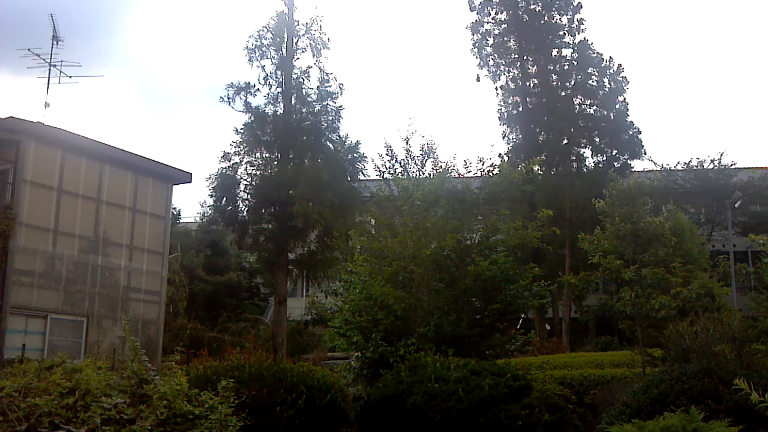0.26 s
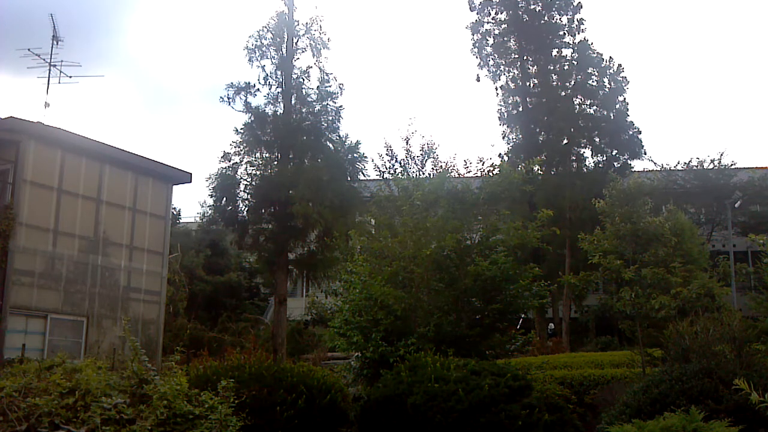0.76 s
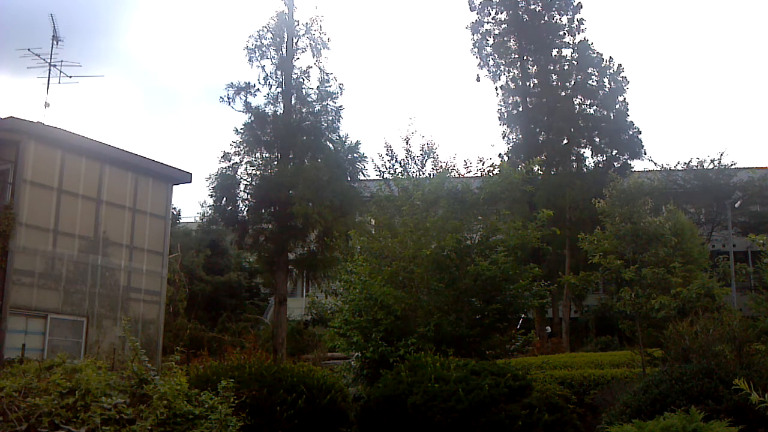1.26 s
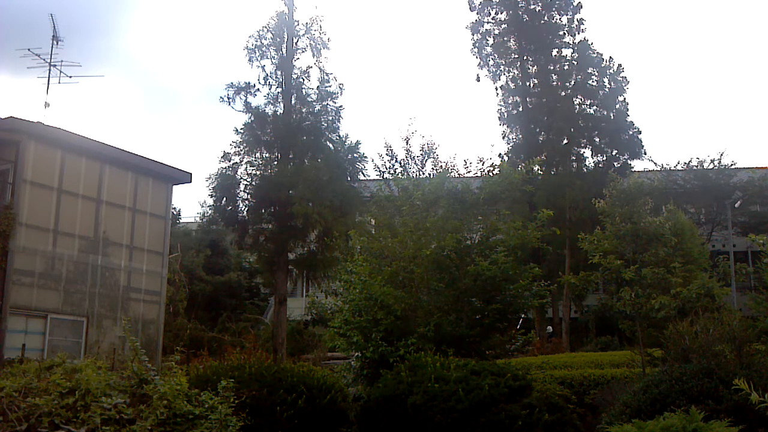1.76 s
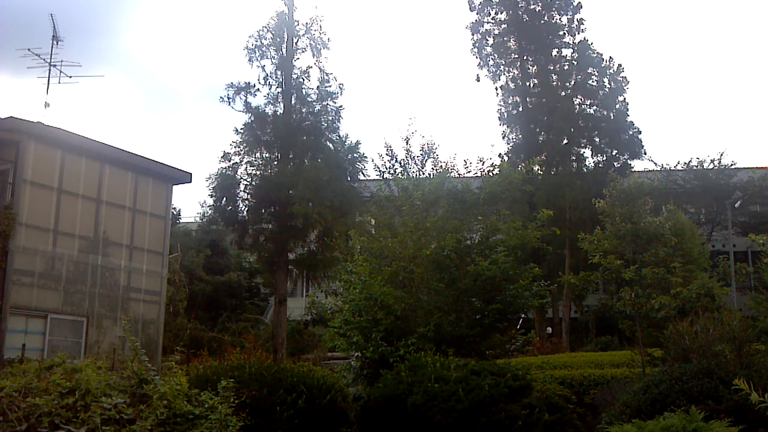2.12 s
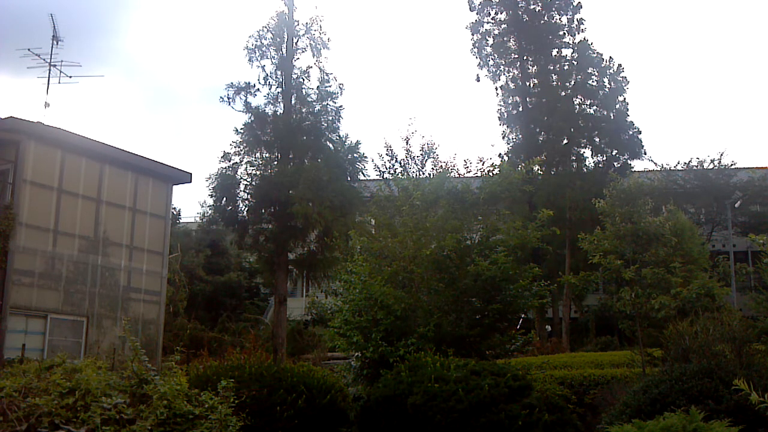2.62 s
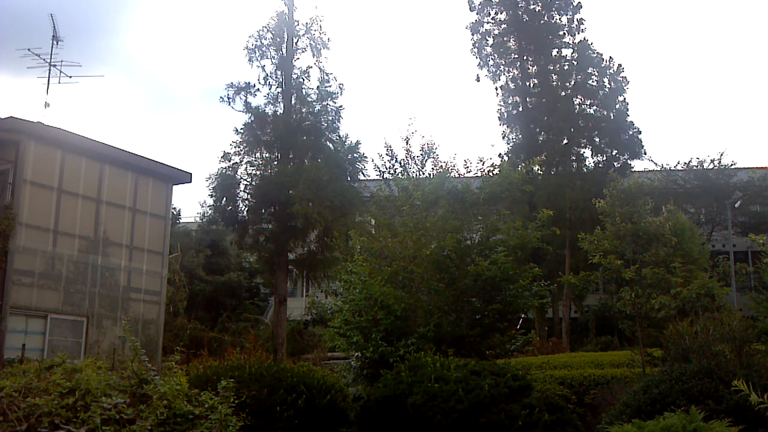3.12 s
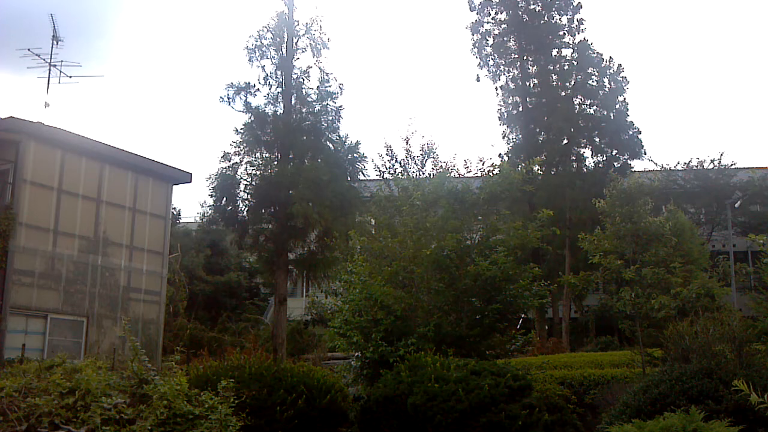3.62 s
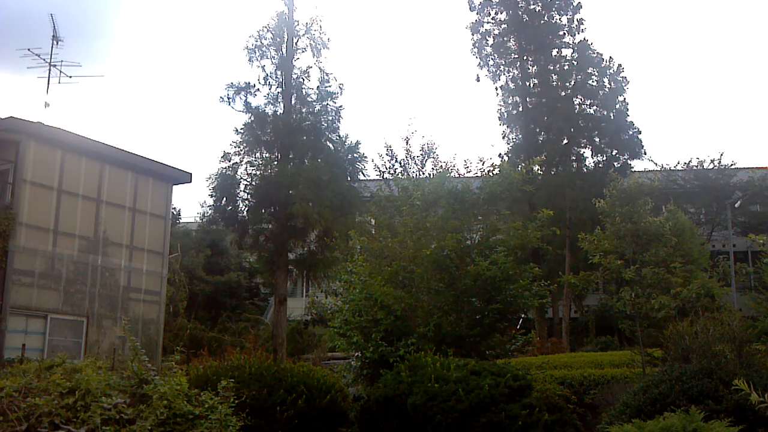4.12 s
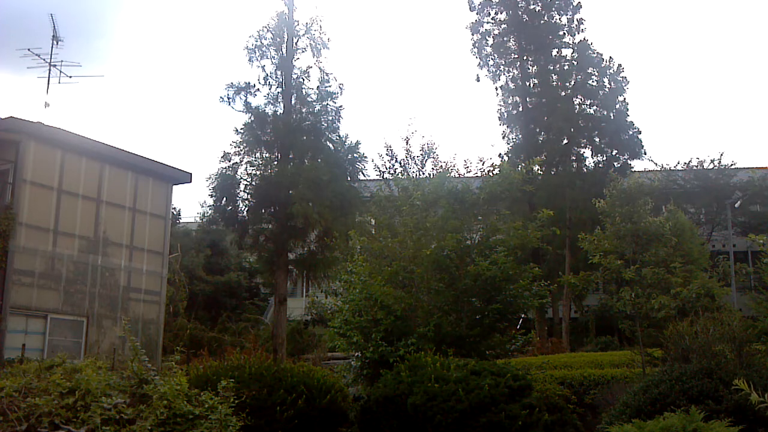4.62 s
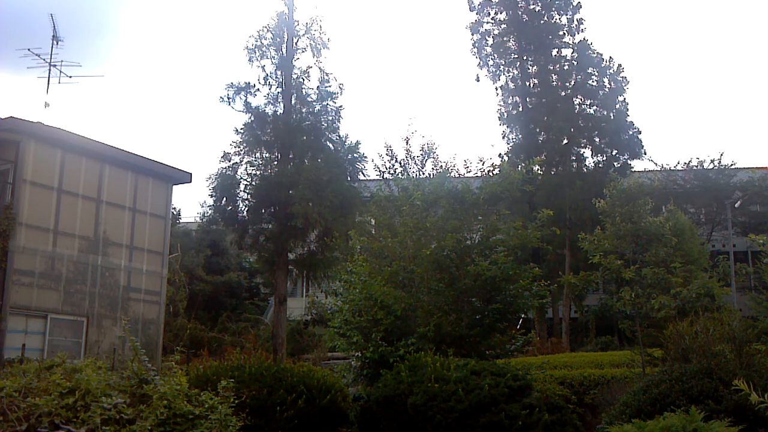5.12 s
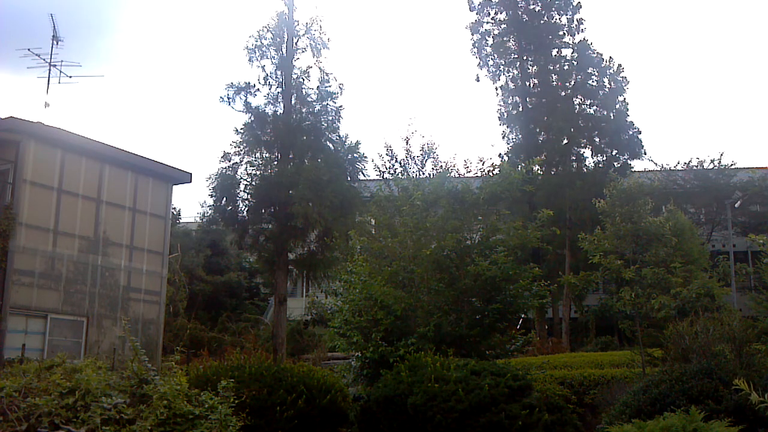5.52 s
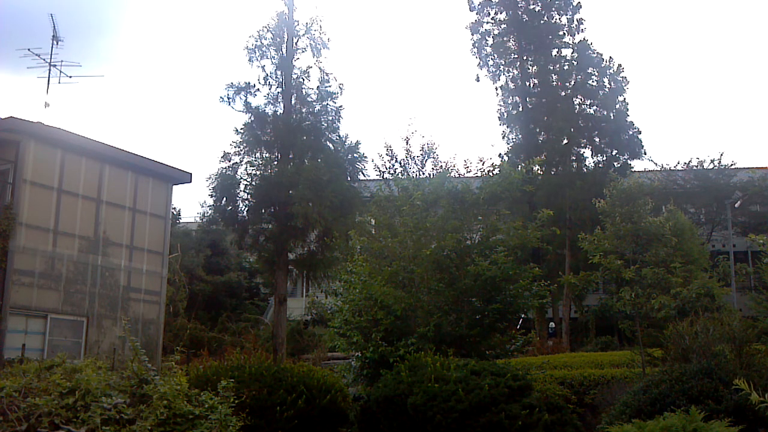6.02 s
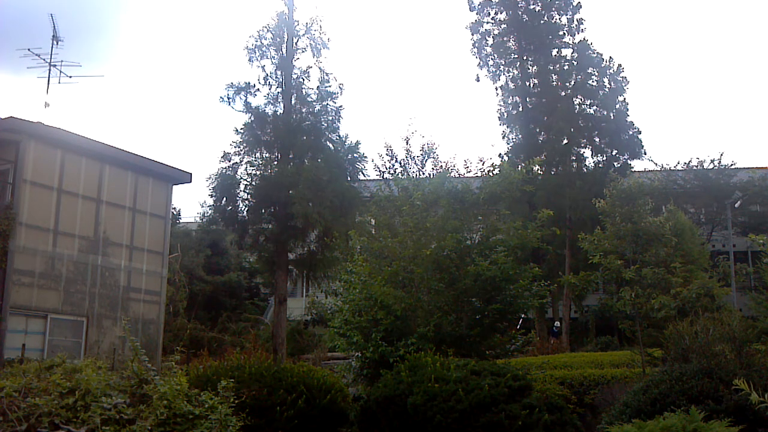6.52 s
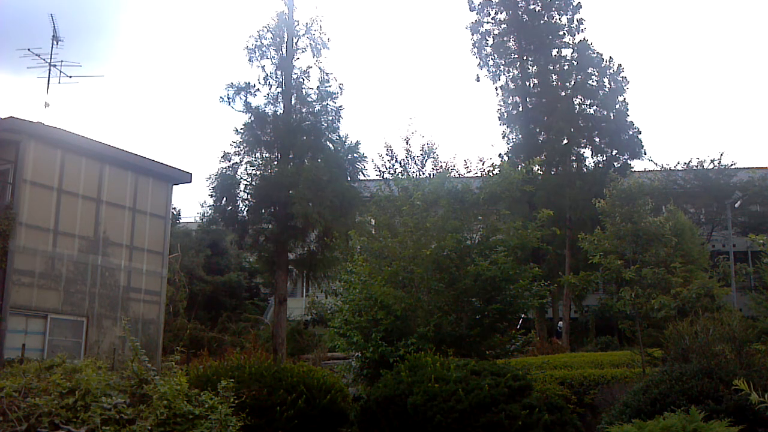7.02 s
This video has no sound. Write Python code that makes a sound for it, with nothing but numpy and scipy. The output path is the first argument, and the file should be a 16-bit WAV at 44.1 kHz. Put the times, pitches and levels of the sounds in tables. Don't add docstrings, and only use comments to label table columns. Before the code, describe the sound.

A mono outdoor scene of about seven seconds, heard from across a garden. A hammer drives a wedge into a thin trunk: full blows at 0.1 and 1.45 s, a feeble, clacky tap at 2.3, another full blow at 3.4, then tighter, higher knocks at 4.3 and, slightly softer, 5.3. Each is a short damped thud without deep bass, with brief trunk ring, slap of faces and steel crack, followed by echoes under a tenth and near two tenths of a second and a diffuse tree tail. Very high, fast bird chips come in bursts around 0.2, 1.0-1.7, 2.1-2.9, 3.1-4.2, 5.1-5.5 and 6.4-6.7 s. A fainter bird whistles quick gliding motifs, clearest from 2.6 to 4.9. Overlapping cicadas swell, buzz and stop over a thin high drone. A quiet distant hum persists; a twig ticks twice quickly at 6.8.

```python
import sys
import numpy as np
from scipy import signal
from scipy.fft import rfft, irfft, next_fast_len
from scipy.io import wavfile
from scipy.ndimage import uniform_filter1d, map_coordinates

SR = 44100
rng = np.random.default_rng(int(sys.argv[2]) if len(sys.argv) > 2 else 0)


def voltage_ratio(decibels):
    exponent = np.asarray(decibels, float) / 20
    return 10 ** exponent


def unload_wav(signal):
    wavfile.write(
        sys.argv[1],
        SR,
        np.round(np.clip(np.atleast_2d(signal).T, -1, 1) * 32767).astype(np.int16),
    )


N = 320607


def unit(x):
    return x / np.sqrt(np.mean(x ** 2) + 1e-20)


def along(points, hz):
    f, v = np.transpose(points)
    return np.interp(np.log(hz + 1), np.log(f + 1), v)


def curves(rows, size=N):
    s, *cols = np.transpose(rows)
    return [np.interp(np.arange(size) / SR, s, c) for c in cols]


def wobble(rate_hz):
    return map_coordinates(rng.standard_normal(800), [np.arange(N) * rate_hz / SR])


def filtered(x, response):
    m = next_fast_len(len(x) + SR // 2)
    return irfft(rfft(x, m) * response(np.fft.rfftfreq(m, 1 / SR)), m)[:len(x)]


def resonance(centre_hz, width_hz):
    return lambda f: 1j * f * width_hz / (centre_hz ** 2 - f * f + 1j * f * width_hz)


def add(track, s, sound):
    at = round(s * SR)
    part = track[max(at, 0):max(at + len(sound), 0)]
    part += sound[max(-at, 0):][:len(part)]


def ring(modes, t):
    return sum(voltage_ratio(db - 60 * t / t60) * np.sin(2 * np.pi * hz * t) for hz, db, t60 in modes)


def hammer():
    # (time [s], peak [dB], thud [Hz], trunk ring [dB], clack [dB])
    blows = [
        (0.087, -14.5, 940, -3.5, -24),
        (1.45, -14, 940, -6, -21.5),
        (2.311, -35, 884, 7.5, -8),
        (3.383, -14.5, 960, -4.5, -17),
        (4.339, -14.5, 1210, -9.5, -16.5),
        (5.337, -16, 1179, -5, -16),
    ]
    # (frequency [Hz], level [dB], t60 [s])
    trunk_modes = [(671, 0, 0.046), (787.6, -2, 0.047), (977, 7, 0.016), (1073, -5, 0.022),
                   (1156, 7, 0.011), (1354, 5.5, 0.0087)]
    crack_under_db, full_blow_db, crack_growth = -4.5, -16, 0.56
    direct, t = np.zeros(N), np.arange(SR // 8) / SR
    to_walls, to_trees, to_far_house = np.zeros((3, N))
    impulse = np.eye(1, len(t))[0]

    def faces(f):
        return resonance(1600, 1300)(f) * resonance(2400, 1700)(f)

    def steel(f):
        return resonance(5400, 3600)(f) * resonance(5000, 5000)(f) / (1 + 1j * f / 9000) ** 2

    def thin_trunk_and_dull_top(f):
        top = 1j * f / 7600
        return (1j * f / (330 + 1j * f)) ** 3 / (1 + top / 0.98 + top ** 2)

    for s, db, thud_hz, ring_db, clack_db in blows:
        tight = thud_hz / 950
        thud = -2.8 * ring([(thud_hz, 0, 0.0087 / tight ** 0.67)], t)
        thud *= (1 - np.exp(-t / 0.0014)) ** tight ** 2
        wood = -voltage_ratio(ring_db - 3.0) * ring(trunk_modes, t * tight ** 0.086) * (1 - np.exp(-t / 0.0024))

        chatter = rng.standard_normal(len(t)) * voltage_ratio(-60 * t / 0.022) * (1 - np.exp(-t / 0.00092))
        clack = voltage_ratio(clack_db + 34.5) * filtered(chatter / np.linalg.norm(chatter), faces)
        slap = voltage_ratio(clack_db + 34.0) * filtered(impulse, faces)

        crack_db = clack_db + crack_under_db + crack_growth * (db - full_blow_db)
        crack = voltage_ratio(crack_db + 26) * filtered(impulse, steel)
        grit = voltage_ratio(crack_db) * unit(filtered(rng.standard_normal(len(t)), steel)) * voltage_ratio(-60 * t / 0.013)

        sideways = voltage_ratio(-30 * (tight - 1))
        add(direct, s + 0.00037, voltage_ratio(db + 2.0) * (thud + wood + 0.68 * clack + 0.25 * crack + grit))
        add(to_walls, s + 0.00042, voltage_ratio(db + 1.5) * (sideways * thud + wood + 0.82 * clack + 0.54 * crack))
        add(to_trees, s + 0.00042, voltage_ratio(db + 1.5) * (sideways * thud + wood + slap + 1.9 * crack))
        far = sideways ** 0.42 * thud + 0.5 * wood + 0.27 * clack + 0.3 * crack
        add(to_far_house, s + 0.00036, voltage_ratio(db + 0.6) * far)
    spread = [filtered(path, thin_trunk_and_dull_top) for path in (to_walls, to_trees, to_far_house)]
    return filtered(direct, thin_trunk_and_dull_top), spread


def yard():
    # (delay [s], level [dB], dull above [Hz])
    near_walls = [(.0034, -8.5, 3000), (.0066, -8, 2420), (0.0095, -9.5, 1800), (.0135, -10.5, 1500),
                  (0.075, -34, 1600), (0.0793, -12, 1480), (.0882, -31, 1600)]
    # (delay [s], level [dB], dull above [Hz])
    far_house = [(.1685, -24, 1500), (0.1714, -8.5, 1600), (0.1798, -10.5, 1500)]
    # (delay [s], hold [s], t60 [s], level [dB], treble over it [dB])
    belts = [(.004, 0.049, .09, -30, 8.5), (0.066, 0.013, 0.61, -23, 4.5), (0.17, 0.015, 0.064, -23, -8),
             (0.199, 0.011, 1.3, -39.5, -1.5), (.3, .45, 1.7, -50, -2)]
    rise_s = 0.0058
    size = SR * 4 // 5
    t = np.arange(size) / SR

    def mirrors(walls):
        def response(f):
            return sum(voltage_ratio(db) * np.exp(-2j * np.pi * f * s) / (1 + 1j * f / (2.1 * hz)) ** 3
                       for s, db, hz in walls)
        return filtered(np.eye(1, size)[0], response)

    shapes = [np.clip((t - s) / rise_s, 0, 1) * voltage_ratio(db - 60 * np.maximum(t - s - hold, 0) / t60)
              for s, hold, t60, db, _ in belts]
    dull = np.sqrt(sum(g ** 2 for g in shapes))
    bright = np.sqrt(sum((g * voltage_ratio(row[-1])) ** 2 for g, row in zip(shapes, belts)))
    noise = rng.standard_normal(size)
    low = filtered(noise, lambda f: 1 / (1 + (f / 1300) ** 4))
    top = filtered(noise, lambda f: 1 - 1 / (1 + (f / 3800) ** 4))
    air = voltage_ratio(-60 * t / 0.5)
    scatter = voltage_ratio(-18.5) * (dull * low + bright * (noise - low - top + 1.07 * air * top))
    return mirrors(near_walls), scatter, mirrors(far_house)


def trill_chips():
    # (first chip [s], last chip [s], level [dB], growth [dB per chip], early hurry [s])
    trills = [
        (0.204, 0.626, -53, -.5, 0.014),
        (1.342, 1.721, -51.5, -0.5, 0.011),
        (2.522, 2.907, -48.5, 1.4, 0.013),
        (3.8275, 4.153, -45, -.6, 0.0052),
        (5.0494, 5.491, -45.5, -0.1, 0.0053),
        (6.346, 6.7276, -47.5, -0.1, .013),
    ]
    chip_gap_s, hurry_fades, ends_db = 0.055, 0.42, -5
    first_hz, peak_hz, sag_hz, overshoot = 8000, 8396, 45, 0.26
    rows = []
    for first, last, db, growth_db, hurry in trills:
        k = np.arange(round((last - first) / chip_gap_s) + 1)
        early = hurry * (1 - hurry_fades ** k)
        times = first + (last - first + early[-1]) * k / k[-1] - early
        levels = db + growth_db * (k - k[-1] / 2) + ends_db * ((k == 0) | (k == k[-1]))
        levels = levels + rng.normal(0, 0.46, len(k))
        loud_hz = np.where(k == 0, first_hz, peak_hz - sag_hz * k) + rng.normal(0, 70, len(k))
        rows += zip(times, levels, loud_hz, overshoot + rng.normal(0, 1, len(k)) / 20)
    return rows


def trill():
    # (time [s], peak [dB], loudest [Hz], overshoot [0-1])
    uneven_chips = [(1.0261, -53, 7540, 0.2), (1.0799, -65, 7740, .2), (1.1368, -64, 7700, .3),
                    (1.2002, -55, 8080, .3), (1.254, -46.5, 8160, 0.37), (1.3074, -56, 7700, 0.5),
                    (1.3688, -54, 7760, .3), (1.434, -70, 7600, 0), (2.0872, -56, 7760, 0.07),
                    (2.139, -59, 7740, 0.1), (2.193, -53.5, 7850, .9), (2.2538, -49, 7800, 1),
                    (2.3007, -54, 7700, .9), (2.36, -46.5, 8080, 0.25), (2.4206, -47, 8000, 0.3),
                    (3.0735, -49, 7940, 0.14), (3.1308, -63, 8000, .5), (3.1842, -50.5, 7900, 0.45),
                    (3.2344, -46.5, 7900, 0.9), (3.29, -41, 8230, 0.13), (3.3492, -41, 8260, .04),
                    (3.4132, -58, 7640, .3), (3.469, -42, 8290, 0), (5.1194, -54, 8100, .2),
                    (5.246, -57, 8200, .3), (5.3053, -54, 7960, 0.4)]
    track = np.zeros(N)
    u = np.linspace(-1, 1, round(0.0139 * SR))
    for s, db, loud_hz, over in trill_chips() + uneven_chips:
        top_hz = loud_hz + 150 + 900 * np.clip(over, 0, 1.3)
        hz = top_hz - (top_hz - 6700) * np.abs(u) ** 1.6
        beak = 1 / (1 + ((hz - loud_hz) / 450) ** 2)
        level = voltage_ratio(db - 7.5) * beak * np.cos(np.pi * u / 2) ** 0.5
        add(track, s - 0.0045, level * np.sin(2 * np.pi * np.cumsum(hz) / SR))
    return track


def songbird():
    # (time into the motif [s], frequency [Hz], level [dB])
    low = [
        [(0, 3600, -5.5), (.03, 3900, -1.5), (.046, 4250, -3.5), (.056, 4200, -4), (.066, 3700, -7)],
        [(.042, 3000, -2), (.053, 3370, -7.5), (.066, 3700, -7)],
        [(.078, 3780, -2), (.097, 4000, -2.5), (.112, 4250, -1), (.121, 4000, -5.5), (.132, 2900, -8)],
    ]
    mid = [
        [(0, 3650, -11), (.045, 4450, -7.5), (.075, 4680, -5), (.104, 4760, -3), (.113, 4300, -11)],
        [(.065, 3700, -13), (.082, 4150, -4), (.095, 4400, -9)],
        [(.118, 4550, -19), (.15, 4720, -15), (.174, 4750, -19), (.18, 4000, -9), (.186, 3000, -11)],
    ]
    high = [
        [(0, 4000, -12), (.012, 4500, -2), (.045, 5350, 0), (.085, 6250, -4), (.108, 6200, -5),
         (.118, 5200, -12)],
        [(.062, 3300, -14), (.078, 4650, -10), (.1, 5250, -10), (.115, 5600, -4), (.128, 5900, -5)],
        [(.14, 6200, -8), (.17, 6250, -5), (.178, 5300, -9)],
    ]
    short = [
        [(0, 3698, -18), (.012, 4584, -5), (.045, 5350, -6.5), (.07, 5858, -5)],
        [(.06, 3630, -10), (.068, 4244, -12), (.088, 5098, -11)],
        [(.097, 5227, -2), (.108, 5400, -6), (.122, 6400, -7)],
    ]
    flat = [
        [(0, 3700, -4), (.025, 3900, 0), (.048, 4000, -4)],
        [(.04, 3150, -5), (.052, 3350, -1), (.064, 3550, -5)],
        [(.074, 3800, -3), (.09, 3900, 0), (.11, 3950, -4)],
    ]
    fall = [
        [(0, 4500, -3), (.04, 4300, 0), (.085, 4100, -2)],
    ]
    # (time [s], level [dB], pitch factor)
    low_at = [(-.11, -65, 0.98), (0.153, -63.5, 1.001), (0.445, -60, 1), (.665, -61, 1.01),
              (0.93, -60.5, 0.99), (1.129, -62, 1.01), (1.424, -65, 0.99), (1.63, -65, 1.001),
              (1.874, -63.5, 0.98), (2.099, -63.5, 0.98), (2.366, -66, 1.04)]
    mid_at = [(2.74, -56, 1.001), (3.176, -56, 1.001)]
    high_at = [(3.025, -60, 1.001)]
    short_at = [(2.596, -60.5, 0.96), (3.491, -54, 1.1), (3.891, -56.5, 1.02), (4.305, -51.5, 1.001),
                (4.736, -57, 1.01)]
    flat_at = [(3.67, -70, 1.0), (4.07, -69, 1.0), (4.9, -77, .97)]
    fall_at = [(5.89, -74.5, 1.0), (7.09, -78, .97)]
    track = np.zeros(N)
    for motif, times in [(low, low_at), (mid, mid_at), (high, high_at),
                         (short, short_at), (flat, flat_at), (fall, fall_at)]:
        for s, db, pitch in times:
            for note in motif:
                into, hz, note_db = np.transpose(note)
                t = np.arange(into[0], into[-1], 1 / SR)
                glide_hz = pitch * uniform_filter1d(np.interp(t, into, hz), size=90)
                level = voltage_ratio(db - 3.5 + np.interp(t, into, note_db) + rng.normal(0, 1))
                level = level * signal.windows.tukey(len(t), 0.12)
                add(track, s + into[0], level * np.sin(2 * np.pi * np.cumsum(glide_hz) / SR))
    return track * voltage_ratio(1.54 * wobble(70))


def cicadas():
    # (tymbal [Hz], swell [dB], phrases (start [s], end [s], last level [dB]))
    singers = [
        (6670, 9.2, [(-.3, .27, -64), (1.0, 1.53, -65.5), (2.3, 2.815, -65), (3.62, 4.165, -65), (5.02, 5.56, -65), (6.28, 6.83, -65.5)]),
        (6430, 6.2, [(-.1, .48, -70), (1.05, 1.65, -67), (2.06, 2.87, -74), (3.3, 3.87, -73), (4.48, 4.983, -69), (5.6, 6.134, -70.5), (6.78, 7.246, -69.5)]),
        (6165, 2.6, [(-.2, .45, -70.5), (.9, 1.76, -75.5), (2.19, 2.9, -72), (3.6, 4.27, -72), (4.9, 5.56, -71.5), (6.2, 6.862, -70)]),
        (5970, 6.5, [(.5, 1.45, -76), (2.3, 2.85, -69.5), (3.42, 4.1, -72), (4.5, 5.3, -74), (5.81, 6.401, -72.5), (6.9, 7.5, -74.5)]),
        (5300, 1.6, [(-0.58, 4.3, -86)]),
    ]
    # (frequency [Hz], width [Hz], level [dB])
    chorus = [(6280, 1700, -79), (5300, 270, -102)]
    out = np.zeros(N)
    for tymbal_hz, swell_db, phrases in singers:
        for start, end, last_db in phrases:
            u = np.linspace(0, 1, round((end - start) * SR))
            turns = np.cumsum(147 - 19 * u) / SR
            clicks = np.diff(np.floor(turns), prepend=0)
            rattle = (0.5 + 0.5 * np.cos(2 * np.pi * turns)) ** 4 + 0.11
            drive = 17 * clicks * voltage_ratio(rng.normal(0, 1.2, len(u))) + rattle * rng.standard_normal(len(u))
            swell = voltage_ratio(last_db - swell_db * (1 - u ** 0.7))
            swell = swell * np.minimum(1, np.minimum(u / 0.08, (1 - u) / 0.02))
            add(out, start, swell * unit(filtered(drive, lambda f: resonance(tymbal_hz, 360)(f) ** 3)))
    for hz, width_hz, db in chorus:
        blur = filtered(rng.standard_normal(N), lambda f: resonance(hz, width_hz)(f) ** 3)
        out += voltage_ratio(db + wobble(3.9)) * unit(blur)
    return out


def garden(x):
    # (frequency [Hz], t60 [s])
    decay = [(3000, 0.96), (9000, 0.13)]
    hz, t, z = signal.stft(rng.standard_normal(SR // 2), SR, nperseg=256)
    tail = signal.istft(z * voltage_ratio(-60 * t / along(decay, hz)[:, None]), SR, nperseg=256)[1]
    return signal.fftconvolve(x, tail / np.linalg.norm(tail))[:N]


def twig():
    # (time [s], peak [dB])
    snaps = [
        (6.8215, -43.5),
    ]
    track = np.zeros(N)
    for s, db in snaps:
        for lag_s, lag_db in [(0, 7), (0.0025, -1)]:
            add(track, s + lag_s, voltage_ratio(db + lag_db + 10) * np.ones(1))

    def wood(f):
        return (resonance(1100, 1800)(f) - 0.55 * resonance(4800, 2500)(f)) / (1 + 1j * f / 6000)

    return filtered(track, wood)


def town():
    # (frequency [Hz], density [dB per Hz])
    spectrum = [(25, -36), (42, -37), (95, -30.5), (119, -20), (282, -7.5), (536, -1.34), (700, -1.1),
                (936, -2), (1900, -11), (3470, -22), (4850, -21.5), (5800, -30.5), (7600, -27),
                (13500, -28.5), (15600, -29.5)]
    # (time [s], level [dB])
    hum_level = [(0, -67), (1.2, -66), (2.2, -65), (3.2, -65.5), (4.2, -64.5), (5.2, -65.5), (6.2, -66),
                 (7.27, -65.5)]
    z = signal.stft(rng.standard_normal(N), nperseg=512)[2]
    patches = uniform_filter1d(rng.standard_normal(z.shape), size=6, axis=0)
    patches = uniform_filter1d(patches, size=14, axis=1)
    noise = signal.istft(z * voltage_ratio(1.68 * unit(patches)), nperseg=512)[1][:N]
    hum = unit(filtered(noise, lambda f: voltage_ratio(along(spectrum, f))))
    return voltage_ratio(curves(hum_level)[0] + 1.02) * hum


def scene():
    direct, spread = hammer()
    echoes = signal.fftconvolve(spread, yard(), axes=1)[:, :N].sum(axis=0)
    birds = trill() + songbird()
    insects = cicadas()
    haze = voltage_ratio(-6.0) * garden(birds + 0.92 * insects)
    return (direct + echoes + birds + haze + insects + twig() + town())[None]


def low_pass(x):
    return signal.sosfilt(signal.butter(12, 15780, fs=SR, output="sos"), x)


def record(dry):
    offset = -1.0e-4
    kept = filtered(dry[0], lambda f: np.where(f < 15150, 1, 0.1))
    return low_pass(kept[None] + offset)


dry = scene()
out = record(dry)
unload_wav(out)
```